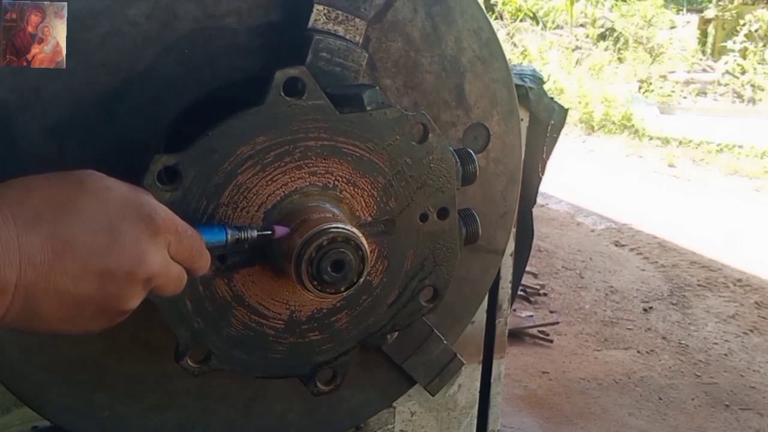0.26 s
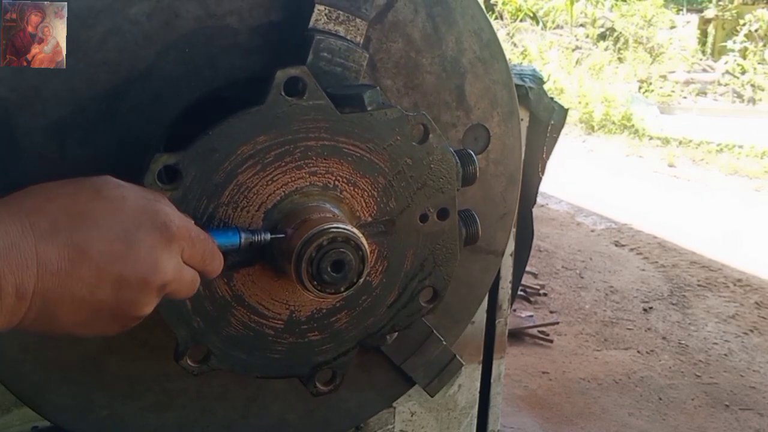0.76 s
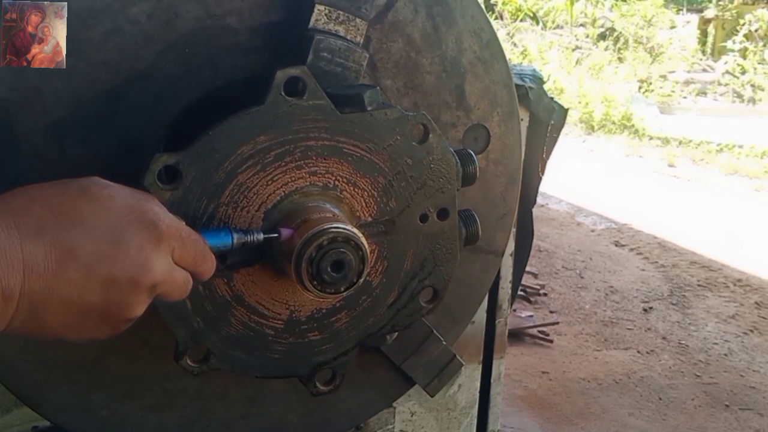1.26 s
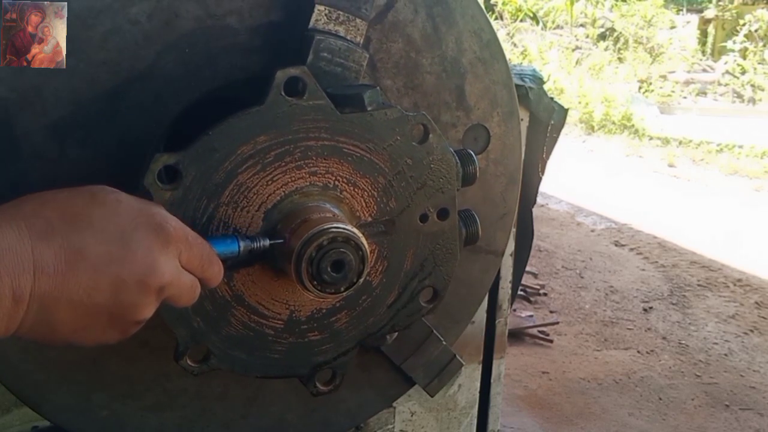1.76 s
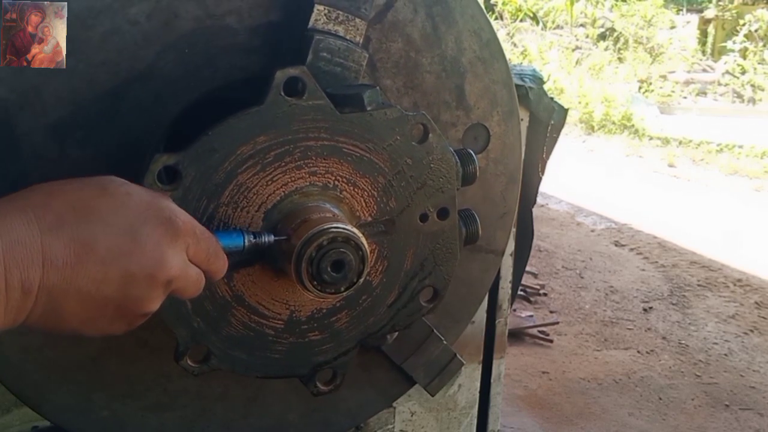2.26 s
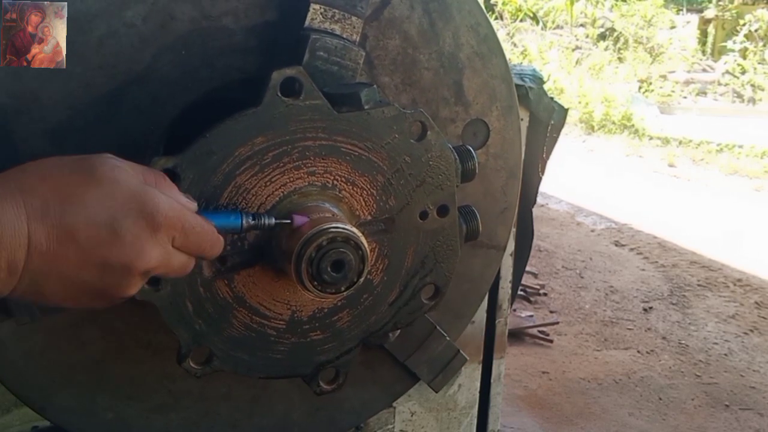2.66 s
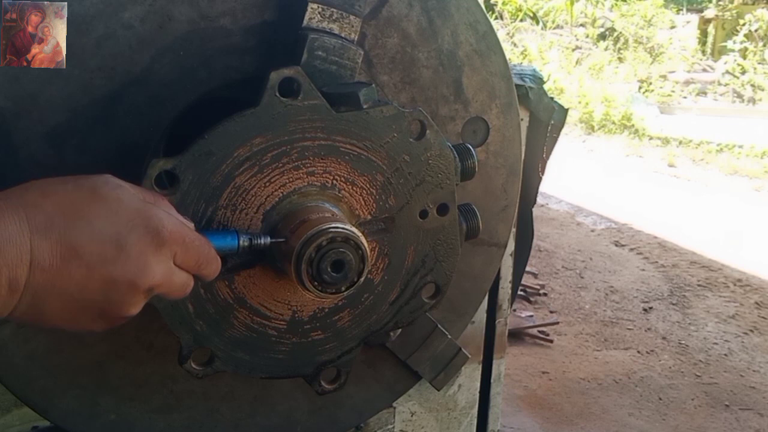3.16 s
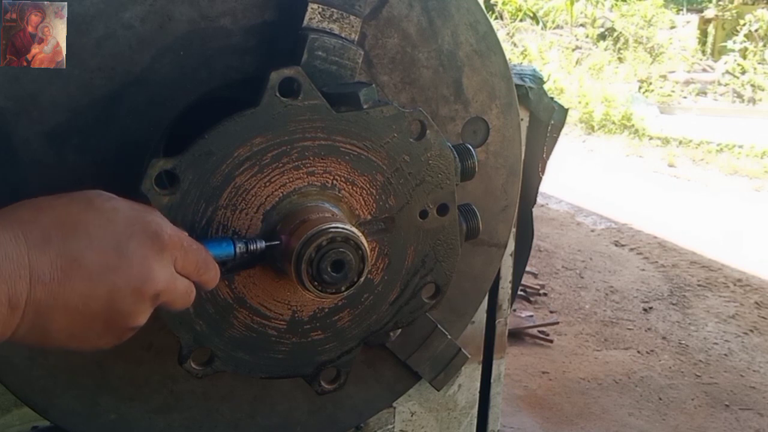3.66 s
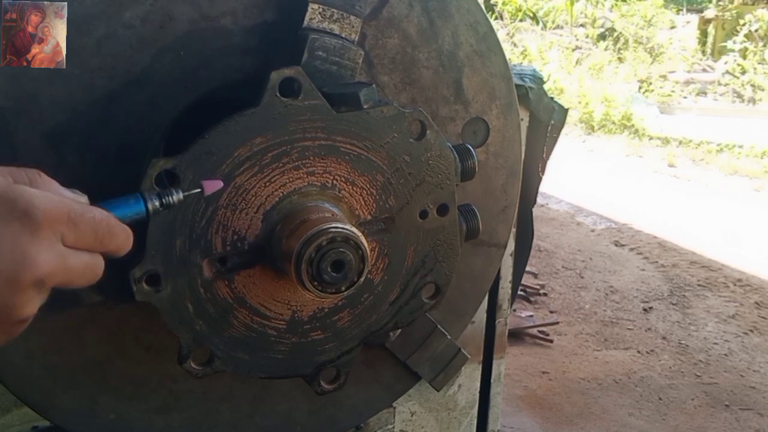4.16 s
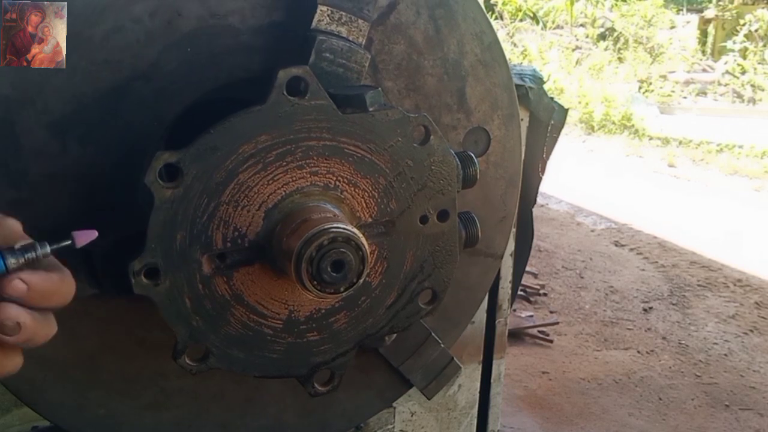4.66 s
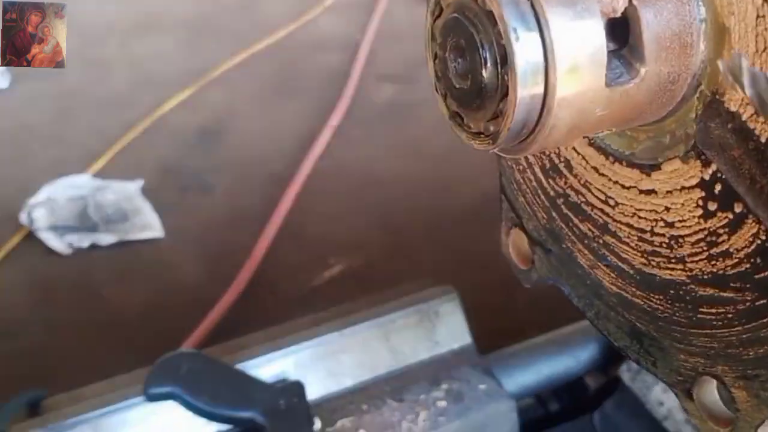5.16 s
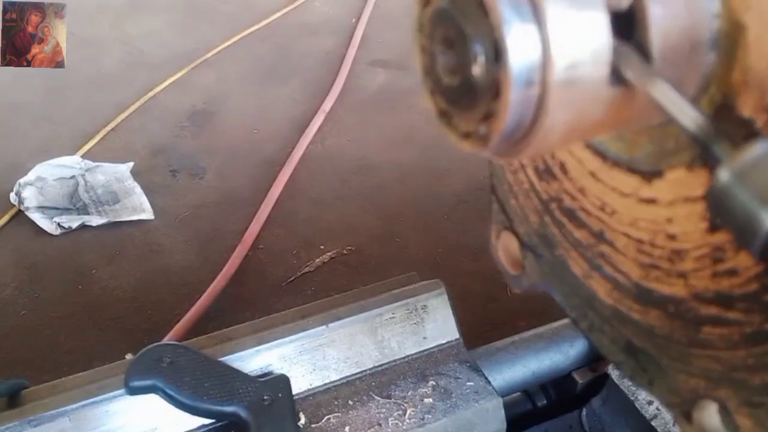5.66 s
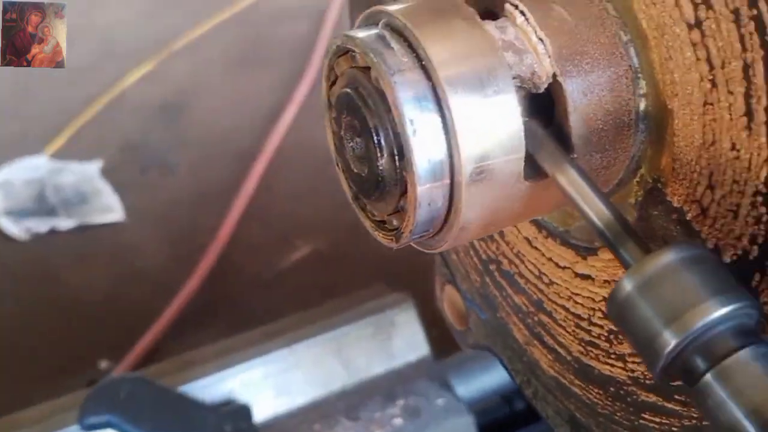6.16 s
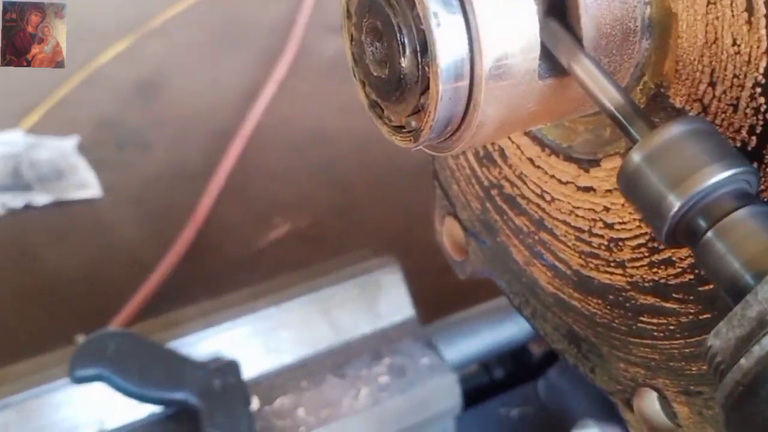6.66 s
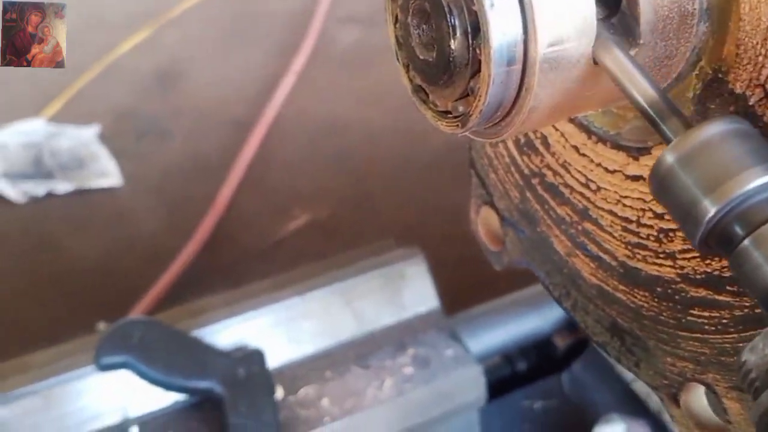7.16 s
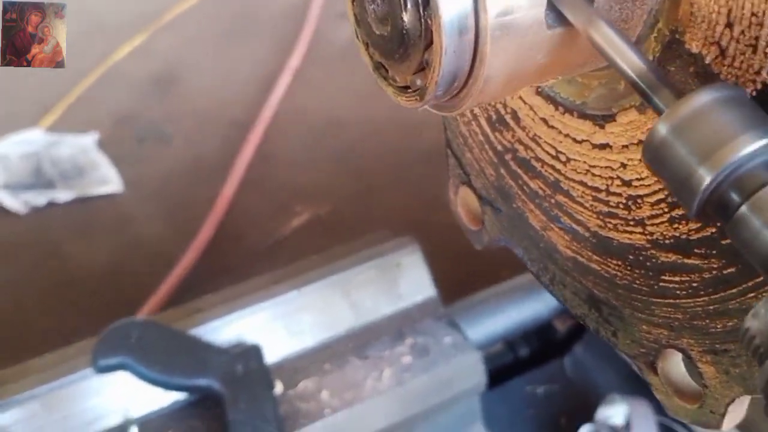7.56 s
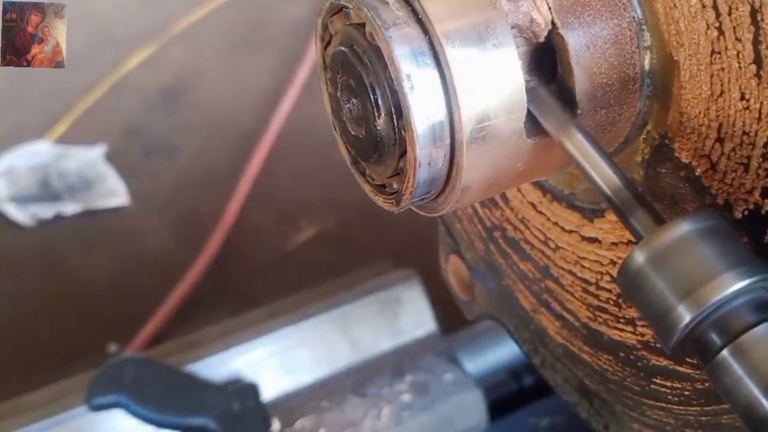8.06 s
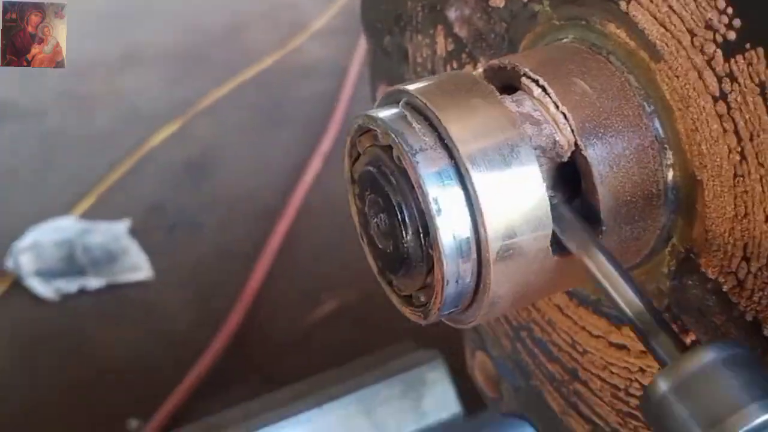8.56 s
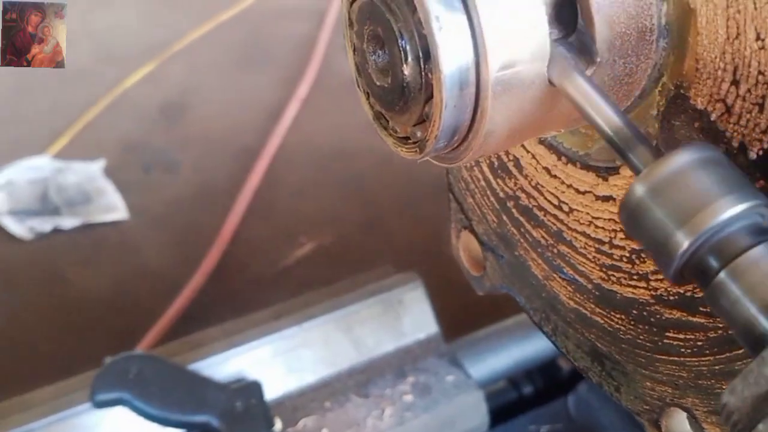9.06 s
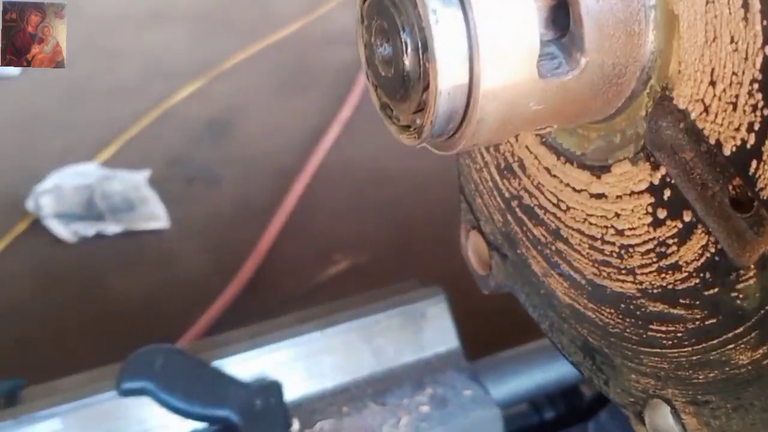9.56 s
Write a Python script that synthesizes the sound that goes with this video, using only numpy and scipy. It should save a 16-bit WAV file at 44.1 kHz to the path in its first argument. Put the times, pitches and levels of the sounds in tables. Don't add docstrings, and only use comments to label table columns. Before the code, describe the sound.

High wavering grinder whine with bright air hiss, a short leak with thumps, then a harsh overloaded air-tool roar that cuts to faint seeping air.

```python
import sys
import numpy as np
from scipy import signal
from scipy.fft import rfft, irfft, next_fast_len
from scipy.io import wavfile
from scipy.ndimage import uniform_filter1d

SR = 44100
rng = np.random.default_rng(int(sys.argv[2]) if len(sys.argv) > 2 else 0)


def generate_wav(sig):
    pcm = np.round(np.clip(np.atleast_2d(sig).T, -1, 1) * 32767).astype(np.int16)
    wavfile.write(sys.argv[1], SR, pcm)


def elevation(decibels):
    levels = np.asarray(decibels, float)
    return 10 ** (levels / 20)


N = 433503


def rms_one(x):
    return x / np.sqrt(np.mean(x ** 2) + 1e-20)


def in_time(rows):
    s, *columns = np.transpose(rows)
    first, last = int(s[0] * SR), min(int(s[-1] * SR), N)
    t = np.arange(first, last) / SR
    return first, [np.interp(t, s, column) for column in columns]


def at_hz(points, hz):
    table_hz, value = np.transpose(points)
    return np.interp(np.log(hz), np.log(table_hz), value)


def drift(rate, size):
    r = np.exp(-80 * np.pi * rate / SR)
    slow = signal.lfilter([1], [1, -2 * r, r * r], rng.standard_normal(size // 40 + 2002))
    settled = rms_one(slow)[2000:]
    return np.interp(np.arange(size) / 40, np.arange(len(settled)), settled)


def add(stage, first, sound):
    ramp = np.arange(sound.shape[-1])
    edges = np.clip(np.minimum(ramp, ramp[::-1]) / (.004 * SR), 0, 1)
    stage[:, first:first + len(ramp)] += sound * edges


def sag(presses, first, size):
    bite_s, recover_s = .055, .06
    t = (first + np.arange(size)) / SR
    lost_pct = np.zeros(size)
    for s, length_s, pct in presses:
        slowing = (t - s) / bite_s
        recovering = 1 + (s + length_s - t) / recover_s
        lost_pct += pct * np.clip(np.minimum(slowing, recovering), 0, 1)
    return 1 - lost_pct / 100


def rotor_turns(first, hz, wobble, shiver):
    held_hz = np.pad(hz, (first, N - first - len(hz)), "edge")
    rate_hz = held_hz * (1 + wobble * drift(15.2, size=N) + shiver * drift(128, size=N))
    return 2 * np.pi * np.cumsum(rate_hz) / SR


def whine(stage, first, hz, level_db, orders, body, turns, flicker_db):
    phase = turns[first:first + len(hz)]
    for k, left_db, right_db, lag in orders:
        flicker = flicker_db * drift(40, size=len(hz))
        gain = np.sqrt(2) * elevation(level_db + at_hz(body, k * hz) + flicker)
        left = elevation(left_db) * np.sin(k * (phase - 2 * np.pi * hz * lag / SR))
        right = elevation(right_db) * np.sin(k * phase)
        add(stage, first, gain * np.array([left, right]))


def air(first, zone_db, turn_db, colour, balance, likeness, lag, turns, pulsing, patchy_db, lumpy_db):
    zone_edges_hz = [800, 6000]
    size = len(turn_db)
    padded = next_fast_len(size)
    puffs = 1 + np.clip(pulsing, 0, 1) * np.sin(turns[first:first + size])
    shared, own_left, own_right = rfft(rng.standard_normal((3, size)) * puffs, padded)
    hz = np.maximum(np.arange(len(shared)) * SR / padded, 1)
    alike = np.clip(at_hz(likeness, hz), 0, 1)
    late = np.exp(-2j * np.pi * hz * lag / SR)
    common = np.sqrt(alike) * shared * [late, late ** 0]
    ports = common + np.sqrt(1 - alike) * np.array([own_left, own_right])
    left_share = 1 / (1 + elevation(-2 * at_hz(balance, hz)))
    ports = ports * elevation(at_hz(colour, hz)) * np.sqrt([left_share, 1 - left_share])

    zones, gust = np.zeros((3, 2, size)), drift(2, size=size)
    for centre in np.arange(4, 14.5, .5):
        weight = np.cos(np.pi / 2 * np.clip((np.log2(hz) - centre) * 2, -1, 1)) ** 2
        zone = np.searchsorted(zone_edges_hz, 2 ** centre)
        depth_db = lumpy_db if zone == 0 else patchy_db
        own_gusts = np.array([drift(30, size=size), drift(18, size=size)])
        flutter = elevation(depth_db * (0.65 * gust + own_gusts))
        zones[zone] += flutter * irfft(ports * weight, padded)[:, :size]
    mix = np.zeros((2, size))
    for db, zone in zip(zone_db, zones):
        mix += elevation(db) / np.std(zone.mean(axis=0)) * zone
    return mix * elevation(np.array([turn_db, -turn_db]) / 2)


def pencil_grinder(stage):
    # [multiple, left level/dB, right level/dB, left lag/samples]
    orders = [(1, -4, -4, 9), (2, 1, -3, 9), (3, -1, -2, 9), (4, -8, -5, 9), (5, -12, 4, 9), (6, -12, 3, 9)]
    # [f/Hz, level/dB]
    body = [(1300, 2), (1700, 0), (2800, 0), (3700, 1.5), (4300, -1), (5400, -2), (6200, -9), (7300, 5),
            (8500, 5), (9600, -3), (11000, -2)]
    # [f/Hz, density/dB per Hz]
    colour = [(24, -72), (40, -48), (207, -32.5), (588, -26), (1040, -28), (2200, -17.5), (2550, -17.5),
              (3610, -14.5), (4090, -12), (5380, -18.5), (6400, -17.5), (7070, -9), (7620, -2), (9780, -8),
              (15300, 0.5)]
    # [f/Hz, level/dB]
    balance = [(60, -10), (110, -3), (200, 2), (380, -18), (700, -6), (1290, -1.5), (2380, 6), (4400, 11),
               (8120, -7), (15000, 8.5)]
    # [f/Hz, share 0-1]
    likeness = [(200, 0.095), (900, 0.05), (1500, 0.35), (4300, 0.24), (5700, 0.064), (8400, 0.11),
                (11000, 0.12), (14500, 0.36)]
    # [t/s, length/s, sag/% of free speed]
    presses = [(-.06, .08, -5.5), (.15, 0.8, 7.5), (.18, 0.051, 3), (.3, .05, 4), (.5, 0.32, 1.5),
               (.89, .05, 3), (1.19, 0.73, 12), (1.31, 0.61, 5.5), (1.63, .05, 3.5), (1.73, 0.079, 8),
               (1.9, 0.35, 4.5), (2.02, .14, 6), (2.43, 0.64, 3.5), (2.72, .36, 7), (2.84, 0.23, 6),
               (2.845, 0.066, 9), (3.23, .09, 3), (3.32, .48, 10), (3.39, 0.38, 8.5), (3.395, .06, 6.5),
               (3.665, .06, 6.5), (4.05, 0.76, 2), (4.52, .07, 5), (4.87, .14, -4.5)]
    # [t/s, whine level/dB, draught on the ports level/dB, turn to the left level/dB]
    hand = [(0.0, -35, -55, -6.5), (.54, -42, -53, -8.5), (1.1, -38, -59, -8.5), (2.0, -38.5, -56, -9.5),
            (2.8, -38.5, -62, -8.5), (3.25, -39, -57, -10), (3.83, -37, -55, -10), (3.97, -34.5, -60, -9.5),
            (4.31, -41, -68, -9.5), (4.58, -38.5, -64, -11), (4.78, -57, -55, -12.5),
            (4.98, -46.5, -50.5, -18.5)]
    free_hz, chatter = 1834, .07
    first, (whine_db, draught_db, turn_db) = in_time(hand)
    size = len(turn_db)
    left = sag(presses, first, size)
    hz = free_hz * (left + chatter * (1 - left) * drift(25, size=size))
    turns = rotor_turns(first, hz, wobble=.002, shiver=.004)
    rush_db = -34 + 0.26 * drift(1.5, size=size) - 0.41 * (turn_db - turn_db.mean())
    hiss_db = -21.5 - 0.41 * np.arange(size) / SR
    exhaust = air(first, (draught_db, rush_db, hiss_db), turn_db, colour, balance, likeness,
                  lag=8.5, turns=turns, pulsing=0.27, patchy_db=1.18, lumpy_db=2)
    add(stage, first, exhaust)
    stage = hub_echo(stage)
    whine(stage, first, hz, whine_db, orders, body, turns, flicker_db=4.2)
    return stage


def hub_echo(stage):
    # [t/s, left delay/samples, right delay/samples, left share, right share]
    reflection = [(0, 37, 21, .45, .35), (1.1, 37, 21, .45, .35), (1.5, 38, 21, .3, .3),
                  (2.1, 37, 21, .3, .3), (2.35, 37, 20, .25, .35), (2.6, 39, 25, .12, .3),
                  (3.2, 44, 24, .25, .25), (4.1, 46, 24, .1, .2), (4.98, 38, 22, .1, .15)]
    first, (left, right, *shares) = in_time(reflection)
    n, out = np.arange(len(left)), stage.copy()
    bright = signal.butter(1, 4000, "high", fs=SR, output="sos")
    for port, (delay, share) in enumerate(zip((left, right), shares)):
        echo = signal.sosfilt(bright, np.interp(n - delay, n, stage[port, n]))
        out[port, n] = (stage[port, n] + share * echo) / np.sqrt(1 + share ** 2)
    return out


def die_grinder():
    # [multiple, left level/dB, right level/dB, left lag/samples]
    orders = [(1, 3.5, -4, -2), (2, 2, -7.5, -13.5), (3, -14, -8, 2), (4, -4.5, -7, -9.5),
              (6, -13, -3.5, -9.5)]
    # [f/Hz, level/dB]
    body = [(400, 0), (900, 0), (1300, 0), (2000, 0), (6000, 0)]
    # [f/Hz, density/dB per Hz]
    colour = [(24, -52), (40, -21), (129, -8), (837, -13.5), (925, -17), (1050, -17), (1860, -10.5),
              (2330, -11.5), (3470, -10.5), (3830, -9.5), (5430, -11), (6150, -11), (7510, -8.5),
              (10900, -14.5), (15500, -10)]
    # [f/Hz, level/dB]
    balance = [(60, -22), (110, -12), (200, -14), (380, -4), (700, -5), (1290, -0.5), (2380, 1.5),
               (4400, 4), (8120, -7), (15000, 3.5)]
    # [f/Hz, share 0-1]
    likeness = [(200, .05), (900, 0.31), (2000, 0.46), (3500, 0.042), (5600, 0.43), (7000, 0.096),
                (15000, 0.11)]
    # [t/s, vane rate f/Hz, flow level/dB re full]
    throttle = [(5.3, 500, -26), (5.31, 563, -10), (5.34, 700, -1), (5.365, 855, -1), (5.39, 785, -3),
                (5.43, 489, -9), (5.47, 435, -7.5), (5.52, 489, -6.5), (5.57, 720, -2.5), (5.61, 921, 0.2),
                (5.66, 968, 0.3), (6.02, 926, 0.46), (9.19, 939, -0.63), (9.205, 939, 0.2),
                (9.23, 938, -14), (9.25, 938, -14)]
    # [t/s, length/s, sag/% of free speed]
    presses = [
        (5.99, 0.049, 2.2),
        (7.14, 0.052, 3),
        (7.2, .04, -2),
        (7.7, 0.061, -1.5),
        (7.97, .12, -1.5),
        (8.62, .14, -1),
    ]
    # buffeting, rush, hiss at full flow [level/dB]
    full_db = [-27, -15, -12]
    follows = [2.2, 0.92, 0.79]
    buffet_range_db, chatter = 15, .07
    catch_s, shut_s, valve_db_per_s = 5.355, 9.205, 500
    stage = np.zeros((2, N))
    first, (hz, flow_db) = in_time(throttle)
    hz = hz * sag(presses, first, len(hz))
    hz = hz + chatter * (hz.max() - hz) * drift(25, size=len(hz)) / 2
    turns = rotor_turns(first, hz, wobble=0.00506, shiver=0.00825)
    t = (first + np.arange(len(hz))) / SR
    idle_s = np.maximum(catch_s - t, 0) + np.maximum(t - shut_s, 0)
    whine_db = -23 + 0.42 * flow_db - valve_db_per_s * idle_s
    whine(stage, first, hz, whine_db, orders, body, turns, flicker_db=1.1)
    zone_db = [db + share * flow_db for db, share in zip(full_db, follows)]
    zone_db[0] = np.maximum(zone_db[0], full_db[0] - buffet_range_db)
    exhaust = air(first, zone_db, 0 * t, colour, balance, likeness,
                  lag=-10.5, turns=turns, pulsing=0.27, patchy_db=1.0, lumpy_db=1.5)
    add(stage, first, exhaust)
    return stage


def leaks():
    # [t/s, leak level/dB, draught on the ports level/dB]
    before = [
        (4.976, 0.1, -51), (5.02, 0.8, -64), (5.112, 1, -55), (5.194, 1, -52),
        (5.224, 3, -40.5),
        (5.292, -3.5, -52),
        (5.314, 7, -31), (5.33, 5, -30)]
    # [t/s, leak level/dB, draught on the ports level/dB]
    after = [
        (9.2, 6.5, -43), (9.234, -8, -35),
        (9.266, 0, -44), (9.318, -0.7, -54), (9.37, -.6, -64), (9.432, 0, -62)]
    # [t/s, leak level/dB, draught on the ports level/dB]
    last_air = [(9.436, -11, -51), (9.45, -1.2, -60), (9.466, 0.8, -59), (9.672, -.3, -59.5), (9.83, 2.6, -57)]
    # [f/Hz, density/dB per Hz]
    near_colour = [(24, -54), (40, -26), (98, -13), (812, -24), (943, -20.5), (2140, -11), (2960, -6.5),
                   (8010, -4), (10500, -9), (15300, -4)]
    # [f/Hz, level/dB]
    near_balance = [(60, 12.0), (110, 32), (200, 19), (380, 7), (700, 16), (1290, -2), (2380, 3),
                    (4400, 3.5), (8120, -11), (15000, 4)]
    # [f/Hz, density/dB per Hz]
    last_colour = [(24, -89), (40, -59), (108, -32), (532, -31), (633, -24), (792, -29), (1340, -15),
                   (2550, -4.5), (4990, -3.5), (7820, -14), (15300, -20)]
    # [f/Hz, level/dB]
    last_balance = [(60, 0.0), (110, 0.5), (200, 2), (380, -1), (700, -0.5), (1290, -5), (2380, -4),
                    (4400, 3), (8120, -17), (15000, 3)]
    # [f/Hz, share 0-1]
    likeness = [(200, 0.25), (1600, 0.41), (3500, 0.13), (5000, 0.54), (7000, 0.074), (15000, 0.073)]
    rush_levels = [-30.5, -27.5, -28]
    hiss_levels = [-21, -22, -23.5]
    stage, still = np.zeros((2, N)), np.zeros(N)
    near = near_colour, near_balance, likeness, -12
    last = last_colour, last_balance, likeness, -4
    moments = zip((before, after, last_air), (near, near, last), rush_levels, hiss_levels)
    for rows, view, rush_db, hiss_db in moments:
        first, (leak_db, draught_db) = in_time(rows)
        zone_db = draught_db, rush_db + 0.99 * leak_db, hiss_db + leak_db
        seep = air(first, zone_db, 0 * leak_db, *view, still, pulsing=0, patchy_db=1.75, lumpy_db=-1.0)
        add(stage, first, seep)
    return stage


def hollow_tone(stage, rows, notes, pan_db):
    first, (level_db,) = in_time(rows)
    pan = elevation([[pan_db / 2], [-pan_db / 2]])
    for hz, width_hz, db in notes:
        band = signal.butter(2, [hz - width_hz / 2, hz + width_hz / 2], "band", fs=SR, output="sos")
        note = rms_one(signal.sosfilt(band, rng.standard_normal(len(level_db))))
        waver_db = 2.3 * drift(5.9, size=len(note))
        add(stage, first, note * elevation(level_db + db + waver_db) * pan)


def hub_bore(stage):
    # [t/s, level/dB]
    blown = [(1.8, -60), (1.98, -45.5), (2.3, -46), (2.9, -42.5), (3.5, -47.5), (3.9, -44), (4.4, -56)]
    # [f/Hz, width f/Hz, level/dB]
    bore_notes = [(1780, 290, -1.5)]
    hollow_tone(stage, blown, bore_notes, pan_db=-1)


def bolt_hole(stage):
    # [t/s, level/dB]
    blown = [(0, -58), (1.2, -62), (1.3, -79), (1.83, -75), (1.9, -60), (2.4, -56), (2.7, -66), (3.4, -71)]
    # [f/Hz, width f/Hz, level/dB]
    hole_notes = [(592, 50, -1.5)]
    hollow_tone(stage, blown, hole_notes, pan_db=0)


def thumps(stage):
    # [t/s, peak level/dB, f/Hz]
    pushes = [
        (4.979, -56, 287),
        (5.099, -40, 80.5),
        (5.159, -34, 80.7),
        (5.217, -38, 400),
        (5.22, -21, 214),
        (5.269, -27, 102),
        (9.245, -28, 330),
        (9.281, -32, 220),
        (9.315, -35, 130),
    ]
    t = np.arange(int(.05 * SR)) / SR
    for s, peak_db, hz in pushes:
        push = np.sin(2 * np.pi * hz * t) * (t / 0.0061) * np.exp(1 - t / 0.004)
        add(stage, int(s * SR), push * elevation(peak_db) * elevation([[5], [-12]]))


def distant_motor(stage):
    # [t/s, level/dB]
    approach = [
        (3.45, -68),
        (3.9, -52.5),
        (4.25, -46.5),
        (4.98, -39),
    ]
    # [f/Hz, width f/Hz, level/dB]
    drone_notes = [(475, 66, -2), (848, 112, -12)]
    hollow_tone(stage, approach, drone_notes, pan_db=-5.5)


def scene():
    stage = pencil_grinder(np.zeros((2, N))) + die_grinder() + leaks()
    hub_bore(stage)
    bolt_hole(stage)
    thumps(stage)
    distant_motor(stage)
    return stage


def throb():
    # [t/s, loudest sample of the block]
    blocks = [(0, 880), (4.98, 115)]
    n = np.arange(N)
    top = np.where(n < blocks[1][0] * SR, blocks[0][1], blocks[1][1])
    return elevation(1.0 * np.cos(2 * np.pi * (n - top) / 1024))


def masked_bands_muted(x, whole_share):
    # [f/Hz, level/dB]
    mute_margin = [(900, 12), (1900, 6.2), (2500, 2.9), (4200, 3.6), (5200, 3.5), (6300, 1.3), (7200, 4.8),
                   (9600, 4.8), (11000, 3.0), (15000, 6)]
    window = np.sin(np.pi * (np.arange(2048) + .5) / 2048)
    hz, s, z = signal.stft(np.vstack([x, x.mean(axis=0)]), SR, window, 2048, 1024)
    power = uniform_filter1d(np.abs(z) ** 2, size=2, axis=2)[:, :750]
    power = power.reshape(3, 150, 5, -1).mean(axis=2)
    band_db = 10 * np.log10(power + 1e-20)
    near_db = signal.medfilt(band_db, [1, 9, 1])
    whole_db = 10 * np.log10(power.mean(axis=(0, 1)) + 1e-20)
    centre = hz[2:750:5, None]
    margin_db = at_hz(mute_margin, centre) - whole_share * (whole_db - near_db)
    muted = (centre > 900) & (band_db < near_db - np.maximum(margin_db, .7))
    muted[:, 1:] |= muted[:, :-1] & (band_db < near_db)[:, 1:]
    muted[:, :-1] |= muted[:, 1:] & (band_db < near_db - .5)[:, :-1]
    lost = .95 * np.repeat(muted, 5, axis=1) * z[:, :750]
    z[:2, :750] -= np.where(lost[2] != 0, lost[2], lost[:2])
    return signal.istft(z[:2], SR, window, 2048, 1024)[1][:, :N]


def low_pass(x):
    return signal.sosfilt(signal.butter(12, 15630, fs=SR, output="sos"), x)


def record(dry):
    loud = np.clip(dry * throb(), -1.0, 1.0)
    muted = masked_bands_muted(loud, whole_share=.34)
    return low_pass(muted)


dry = scene()
out = record(dry)
generate_wav(out)
```